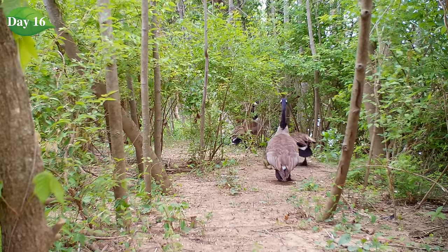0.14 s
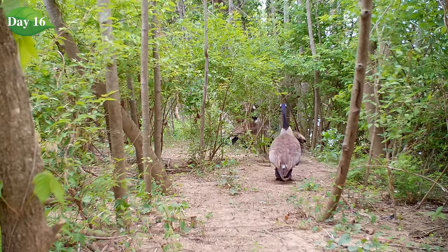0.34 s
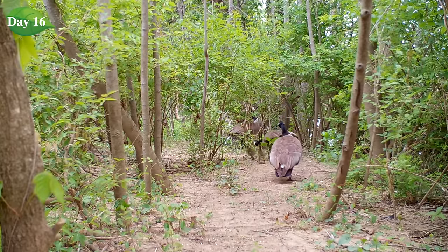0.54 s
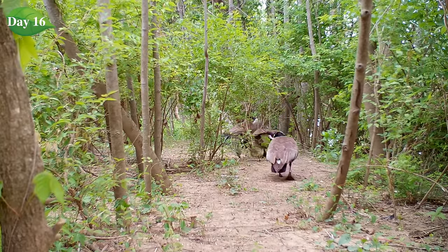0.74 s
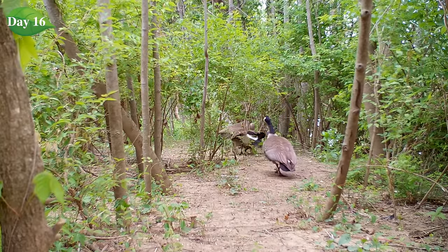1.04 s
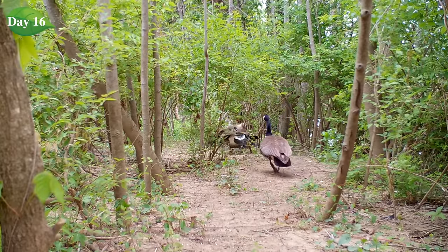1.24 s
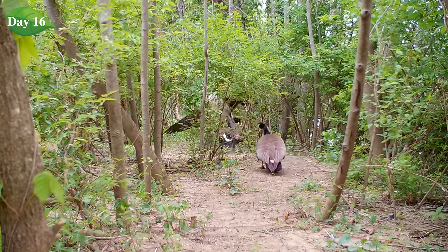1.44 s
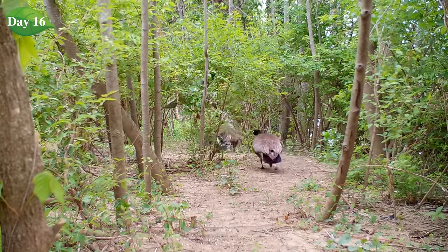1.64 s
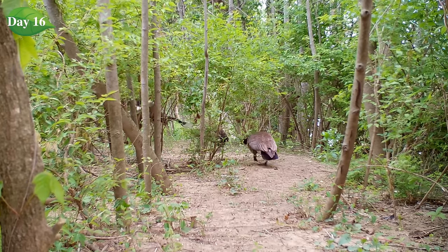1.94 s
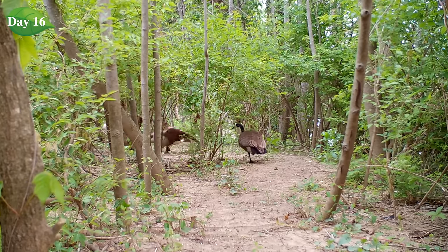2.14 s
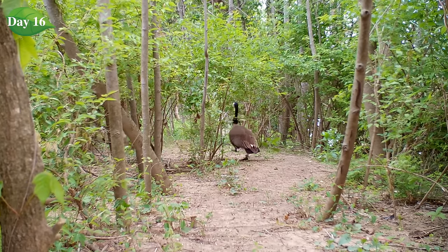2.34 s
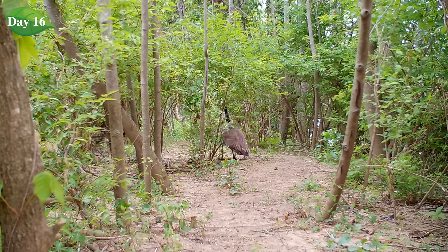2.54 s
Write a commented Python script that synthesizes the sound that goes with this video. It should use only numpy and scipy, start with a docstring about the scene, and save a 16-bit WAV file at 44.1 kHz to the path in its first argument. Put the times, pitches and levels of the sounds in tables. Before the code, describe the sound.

Several quarrelling geese trade brief honks, hoarse clucks and low hissy grunts among echoing trees

```python
"""A woodland path where geese quarrel: one gives clear honks that break into a high yelp, and others
answer with rasping clucks, hoarse calls, squawks and hissy grunts.
Each voice is a pulsing membrane, shaken by a slower flutter, sounding through a long throat;
the grunts are the slow flutter alone.
Feet rustle in dry leaves, the trees echo, the wood hushes softly, and the recorder adds a thin whine."""
import sys
import numpy as np
from scipy import signal
from scipy.fft import rfft, irfft, next_fast_len
from scipy.io import wavfile
from scipy.ndimage import map_coordinates

SR = 44100
rng = np.random.default_rng(int(sys.argv[2]) if len(sys.argv) > 2 else 0)


def transcribe(u):
    """Save the signal u as a 16-bit wav file named by the first command-line argument.

    u: samples, shape (n,) or (channels, n), limited to [-1, 1]; the rate is SR.
    q: integer samples, one column per channel.
    """
    v = np.clip(np.atleast_2d(u).T, -1, 1)
    q = np.round(v * 32767).astype(np.int16)
    wavfile.write(sys.argv[1], SR, q)


N = 119070  # length of the scene in samples
TOP_HZ = 15700  # nothing is kept above this


def amp(db):
    """Turn decibels into a plain multiplier."""
    return 10 ** (np.asarray(db) / 20)


def unit(x):
    """Scale a sound to an average (rms) strength of 1."""
    return x / np.sqrt(np.mean(x ** 2) + 1e-20)


def along(points, hz):
    """Read a curve of (frequency [Hz], value) points, spaced by pitch rather than by Hz."""
    point_hz, values = np.transpose(points)
    return np.interp(np.log(hz + 1), np.log(point_hz + 1), values)


def wobble(n, rate):
    """A smooth random curve of n samples, drawn through `rate` random points a second."""
    knots = rng.standard_normal(int(N * rate / SR) + 4)
    return map_coordinates(knots, [np.arange(n) * rate / SR])


# How much of a treble setting is felt: (frequency [Hz], share of the dB setting)
TREBLE_SHELF = [(1400, 0.11), (2200, 0.9)]


def colour(x, points, treble_db=0):
    """Filter through (frequency [Hz], level [dB]) points and a treble shelf, without pre-echo; rms 1."""
    size = 2 * next_fast_len(len(x) // 2 + 2048)
    hz = np.fft.rfftfreq(size, 1 / SR)
    level_db = along(points, hz) + treble_db * along(TREBLE_SHELF, hz)
    # Folding the cepstrum makes the filter minimum-phase: it responds only after its input
    cepstrum = irfft(np.log(amp(level_db)))
    cepstrum[1:size // 2] *= 2
    cepstrum[size // 2 + 1:] = 0
    response = np.exp(rfft(cepstrum))
    return unit(irfft(rfft(x, size) * response)[:len(x)])


def add(out, start, x):
    """Mix x into out from `start` seconds on."""
    i = int(start * SR)
    out[i:i + len(x)] += x[:max(0, N - i)]


# Hush of the wood: (frequency [Hz], level [dB])
FOREST_COLOUR = [(28, -1.5), (58, -11.5), (236, -9.5), (750, -2.5), (2030, -8), (4300, -26), (6000, -36),
                 (8500, -40.5), (10500, -51.5)]
FOREST_DB = -42


def forest():
    """The steady, softly wavering hush of the wood: coloured noise."""
    noise = colour(rng.standard_normal(N + SR), FOREST_COLOUR)[SR:]  # skip the filter's first second
    return amp(FOREST_DB + 0.35 * wobble(N, 7.3)) * noise


# How long the echo tail rings: (frequency [Hz], time to fade by 60 dB [s])
TAIL_FADE = [(1600, 0.28), (4000, 0.6)]
TAIL_DB, TRUNKS_DB = -12.5, -15.5  # total strength of each echo part, against the direct sound
TRUNKS_S = .055  # the trunk echoes are spread over this time


def woods(x):
    """Nearby trunks give scattered echoes; the wood behind gives a soft tail, fading by pitch."""
    hz, t, spectrum = signal.stft(rng.standard_normal(SR // 2), SR, nperseg=256)
    fade = amp(-60 * t / along(TAIL_FADE, hz)[:, None])
    tail = signal.istft(spectrum * fade, SR, nperseg=256)[1]
    echoes = np.zeros(N)
    for delay in TRUNKS_S * (np.arange(1, 7) + rng.uniform(-.5, .5, 6)) / 6:
        add(echoes, delay, rng.choice([-1., 1.], 1))
    tail *= np.linalg.norm(echoes) / np.linalg.norm(tail)
    add(echoes, .012, amp(TAIL_DB - TRUNKS_DB) * tail)
    return amp(TRUNKS_DB) / np.sqrt(6) * signal.fftconvolve(x, echoes)[:N]


# Steps in dry leaves: (start [s], length [s], level before the swell [dB])
STEP_TIMES = [(1.351, 0.39, -48.5), (1.488, 0.012, -38.5), (1.61, 0.03, -33.5), (2.039, 0.045, -36)]
# Sound of the leaves: (frequency [Hz], level [dB])
LEAF_COLOUR = [(100, -9.5), (2000, 16.5), (5000, -7), (7500, -8), (11000, -60)]


def steps():
    """Each step crushes a clump of tiny leaf cracks: noise of quickly changing strength."""
    out = np.zeros(N)
    for start, length, db in STEP_TIMES:
        n = int(length * SR)
        cracks = rng.standard_normal(n) * amp(3 * wobble(n, 900))
        add(out, start, amp(db) * np.hanning(n) * colour(cracks, LEAF_COLOUR))
    return out


def turning(hz, jitter):
    """Phase of a slightly unsteady oscillator; jitter is a share of its rate."""
    unsteady_hz = hz * (1 + jitter * wobble(len(hz), 334))
    return 2 * np.pi * (rng.random() + np.cumsum(unsteady_hz) / SR)


FLICKER_DB, SMEAR = 3, 1.2  # overtone waver in level [dB] and phase [radians], per unit of wobble
FLICKER_PER_S, OVERTONE_HZ = 45.3, 2200  # overtones above this frequency waver fully
VOICED_HZ = 5200  # harmonics weaken steeply above this


def pulses(phase, hz, bend=0):
    """One membrane pulse a cycle, as a sum of harmonics; overtones waver, and bend [radians] shakes them."""
    k = np.arange(1, int(TOP_HZ / hz))[:, None]
    depth = np.minimum(k * hz / OVERTONE_HZ, 1) ** 2
    wavers = [[wobble(len(phase), FLICKER_PER_S) for _ in k] for _ in range(2)]
    level, lag = np.array(wavers) * depth
    harmonics = amp(FLICKER_DB * level) * np.cos(k * phase + SMEAR * lag + bend * depth)
    rolloff = 1 + (k * hz / VOICED_HZ) ** 6
    return unit((harmonics / rolloff).sum(0))


# Breathy noise, in grunts and calls alike: (frequency [Hz], level [dB])
HISS_COLOUR = [(300, -35.5), (900, 8), (2600, 4), (4700, -12), (8000, -23), (11000, -61.5)]
# Grunts: (start [s], length [s], first pitch [Hz], last pitch [Hz], voice level [dB],
#          hiss against voice [dB])
GRUNT_TIMES = [(0.189, 0.062, 178.3, 194, -36, -19), (.502, .122, 168, 160, -42, 2.5),
               (.745, 0.25, 145.5, 150.4, -42, 1), (2.215, 0.14, 178.6, 168, -35.5, -11),
               (2.670, 0.096, 159, 138.5, -37.5, -9)]
# Throat of the grunts: (frequency [Hz], level [dB])
GRUNT_COLOUR = [(100, -23), (175, -4), (290, -12), (480, 2.5), (850, -6.5), (1150, 9.5), (1700, -9),
                (4000, -26.5), (12000, -72)]
GRUNT_EDGE_S, GRUNT_JITTER = 0.0051, .008  # fade at each end; unsteadiness as a share of the rate
PUFF_DEPTH = .55  # how strongly the hiss swells with each pulse
GRUNT_ROUGH_DB, BUZZ_DB = -10, -2  # noise against buzz in the throat; buzz against noise in the hiss


def grunts():
    """The slow flutter alone; every pulse lets a buzzing puff of hiss through."""
    out = np.zeros(N)
    for start, length, first, last, db, hiss_db in GRUNT_TIMES:
        t = np.arange(int(length * SR)) / SR
        phase = turning(np.linspace(first, last, len(t)), GRUNT_JITTER)
        buzz = pulses(phase, first)
        noise = rng.standard_normal((2, len(t)))
        throat_puffs, hiss_puffs = unit(np.exp(PUFF_DEPTH * np.cos(phase)) * noise)
        voice = colour(buzz + amp(GRUNT_ROUGH_DB) * throat_puffs, GRUNT_COLOUR)
        hiss = unit(colour(hiss_puffs, HISS_COLOUR) + amp(BUZZ_DB) * colour(buzz, HISS_COLOUR))
        swell = np.clip(np.minimum(t, length - t) / GRUNT_EDGE_S, 0, 1)
        add(out, start, amp(db) * swell * (voice + amp(hiss_db) * hiss))
    return out


RISE_POWER, FALL_POWER = 0.69, 1.97  # shape of the swell before and after its peak
JITTER, FLUTTER_JITTER = 0.012, 0.092  # unsteadiness as shares of the rate
ROUGH_DB = -5.5  # noise in the throat, against the pulses
AIR_DB = -19  # noise at the bill, against the voice, before the treble setting


def call(shape, throat, rasps, flutter_hz, treble_db=0, bend=0):
    """One arched call; flutter shakes the pulses in size and shape, putting sidebands round each harmonic."""
    rise, fall, first, middle, last, db = shape
    t = np.arange(int((rise + fall) * SR)) / SR
    n, rising = len(t), t < rise
    # Distance from the peak: 1 at the start, 0 at the peak, 1 at the end
    away = np.clip(np.where(rising, 1 - t / rise, (t - rise) / fall), 0, 1)
    pitch = middle + (np.where(rising, first, last) - middle) * away ** 1.46
    phase = turning(pitch, JITTER)
    shake = turning(np.full(n, flutter_hz), FLUTTER_JITTER)
    flutter = np.exp(np.linspace(*rasps, n) * np.cos(shake))
    warp = bend * (np.sin(shake) + wobble(n, 2 * flutter_hz) / 2)
    membrane = pulses(phase, middle, warp)
    source = flutter * (membrane + amp(ROUGH_DB) * rng.standard_normal(n))
    voice = colour(source, throat, treble_db)
    air = colour(flutter * rng.standard_normal(n), HISS_COLOUR)
    swell = np.cos(away * np.pi / 2) ** np.where(rising, RISE_POWER, FALL_POWER)
    return amp(db) * swell * (voice + amp(AIR_DB + treble_db) * air)


BEND = 0.6  # how far the flutter shakes the overtones [radians], scaled for each kind of call


def answers(rows, throat):
    """Calls from the other geese: the stronger the rasp, the more the flutter bends the pulses."""
    out = np.zeros(N)
    for start, *shape, rasp, flutter_hz, treble_db in rows:
        add(out, start, call(shape, throat, (rasp, rasp), flutter_hz, treble_db, BEND * rasp))
    return out


# Clucks: (start [s], rise [s], fall [s], first, middle and last pitch [Hz], level before swell [dB],
#          rasp depth, flutter [Hz], treble setting [dB])
CLUCK_CALLS = [(0.186, 0.013, 0.045, 345, 365, 396, -33, 0.32, 184, -0.5),
               (.222, 0.014, .06, 693, 665, 664, -26, 0.52, 160.8, -7.5),
               (.242, 0.0074, 0.052, 494, 487.6, 483, -27, 1.6, 180.3, -7),
               (.344, 0.029, 0.02, 657, 681, 650, -28.5, 0.27, 176, -7.5),
               (.364, 0.016, 0.045, 529, 477.5, 476, -32.5, 1.4, 189.3, -1),
               (.408, 0.015, 0.023, 728, 678, 632, -20.5, 0.26, 166, -3.5)]
# Throat of the clucks: (frequency [Hz], level [dB])
CLUCK_COLOUR = [(250, -27.5), (500, -3.5), (660, -11), (800, -7.5), (1000, 2), (1420, 2.5), (1720, -2),
                (2050, -8.5), (3800, -34), (12000, -73)]


def clucks():
    """Short rasping clucks, the membrane shaken by the flutter."""
    return answers(CLUCK_CALLS, CLUCK_COLOUR)


# Hoarse calls: same columns as the clucks
HOARSE_CALLS = [(.496, .035, 0.14, 609, 672.7, 627, -34, 0.84, 333.5, 4),
                (.890, .03, 0.052, 443.7, 462, 478, -28, 0.81, 161.6, 4),
                (.930, 0.037, 0.034, 586, 627.6, 542, -30.5, 0.38, 161, 0.5),
                (2.100, 0.044, .11, 411.6, 397, 310, -37, 0.73, 201.3, -14.5)]
# Throat of the hoarse calls: (frequency [Hz], level [dB])
HOARSE_COLOUR = [(200, -28), (370, 2), (800, -2.5), (1230, 7), (1900, -7), (3400, -7.5), (5200, -14.5),
                 (12000, -70)]


def hoarse_calls():
    """Hoarse answers, fluttering pulses through a throat of their own."""
    return answers(HOARSE_CALLS, HOARSE_COLOUR)


# Squawks: same columns as the clucks
SQUAWK_CALLS = [(2.331, 0.03, 0.062, 519.7, 519.2, 486, -21, 1.57, 146.8, 0),
                (2.345, 0.048, 0.022, 628.3, 637, 666, -20.5, 0.33, 143.6, 0.082),
                (2.397, 0.011, 0.046, 516, 481, 380, -22, 0.22, 143, 1)]
# Throat of the squawks: (frequency [Hz], level [dB])
SQUAWK_COLOUR = [(250, -45), (500, -3), (820, -11), (1050, 8.5), (1400, 8.5), (1700, -9.5), (2400, -23),
                 (3800, -24.5), (12000, -66)]


def squawks():
    """Overlapping squawks, with a slower flutter than the clucks."""
    return answers(SQUAWK_CALLS, SQUAWK_COLOUR)


HONK_FLUTTER_HZ, YELP_RASP = 205.2, 0.39  # flutter of honks and yelps; rasp depth of the yelps
# Yelps: (start [s], rise [s], fall [s], first, middle and last pitch [Hz], level before swell [dB])
YELP_CALLS = [(1.048, 0.03, 0.06, 836, 830, 820, -29.5), (1.349, 0.018, 0.042, 803, 793, 714, -16.5),
              (1.583, 0.018, 0.0056, 793, 817, 827, -24)]
# Throat of the yelps: (frequency [Hz], level [dB])
YELP_COLOUR = [(400, -34.5), (850, -10), (1570, 0.5), (2400, -8.5), (3200, -25), (6000, -34.5),
               (12000, -89)]


def yelps():
    """The honks' breaks into the high register, with the pulses bent half as far."""
    out = np.zeros(N)
    for start, *shape in YELP_CALLS:
        rasps = (YELP_RASP, YELP_RASP)
        add(out, start, call(shape, YELP_COLOUR, rasps, HONK_FLUTTER_HZ, bend=BEND / 2))
    return out


# Honks: (start [s], rise [s], fall [s], first, middle and last pitch [Hz], level before swell [dB],
#         first rasp depth, last rasp depth, treble setting [dB])
HONK_CALLS = [(.620, 0.067, 0.037, 503, 569.6, 573, -20, 0.4, 0.046, -5),
              (1.062, 0.036, 0.024, 531.6, 579.4, 590, -17, .05, 0.19, -9),
              (1.105, 0.016, 0.025, 586.5, 564, 550, -21, 0.58, 0.85, -1.5),
              (1.312, 0.0435, 0.0082, 490.7, 578.4, 576, -17.5, 0.12, 1, -7),
              (1.594, 0.028, 0.047, 542, 589.8, 599, -17.5, 0.12, 0.1, -7.5)]
# Throat of the honks: (frequency [Hz], level [dB])
HONK_COLOUR = [(250, -56), (450, -6), (580, -7), (980, -12), (1170, 6.5), (1450, -2), (1720, -6.5),
               (2300, -12.5), (3300, -17.5), (5000, -54.5), (12000, -73.5)]


def honks():
    """Clear honks and their syllables; the flutter's rasp grows or fades through each."""
    out = np.zeros(N)
    for start, *shape, first_rasp, last_rasp, treble_db in HONK_CALLS:
        rasps = (first_rasp, last_rasp)
        add(out, start, call(shape, HONK_COLOUR, rasps, HONK_FLUTTER_HZ, treble_db, BEND))
    return out


def scene():
    """Geese and footsteps, their echoes among the trees, and the hush of the wood."""
    near = steps() + grunts() + clucks() + hoarse_calls() + squawks() + yelps() + honks()
    return (forest() + woods(near) + near)[None]


WHINE_HZ, WHINE_DB = 7795, -69.5  # a steady tone, level as rms


def record(dry):
    """The recorder adds its electrical whine and keeps nothing above its band limit."""
    t = np.arange(N) / SR
    whine = amp(WHINE_DB) * np.sqrt(2) * np.sin(2 * np.pi * WHINE_HZ * t)
    band_limit = signal.ellip(12, .1, 90, TOP_HZ, fs=SR, output="sos")
    return signal.sosfiltfilt(band_limit, dry + whine, padlen=SR // 10)


dry = scene()
out = record(dry)
transcribe(out)
```